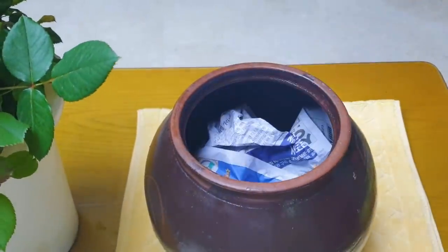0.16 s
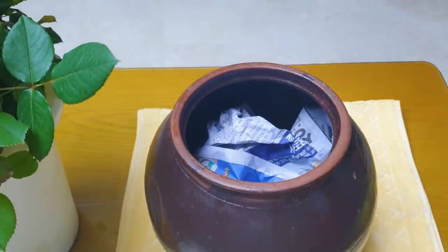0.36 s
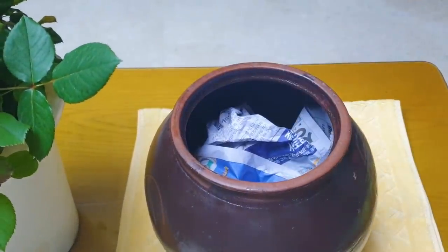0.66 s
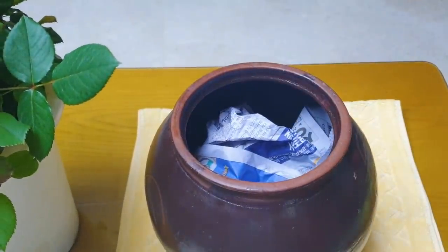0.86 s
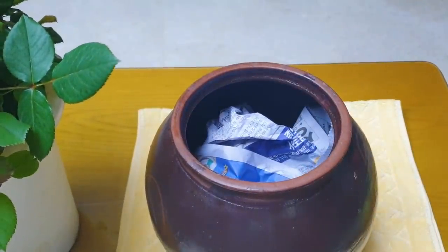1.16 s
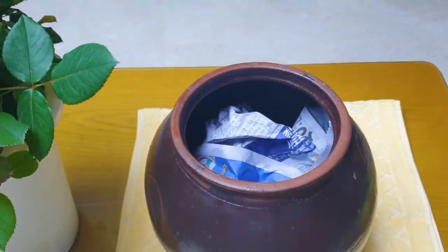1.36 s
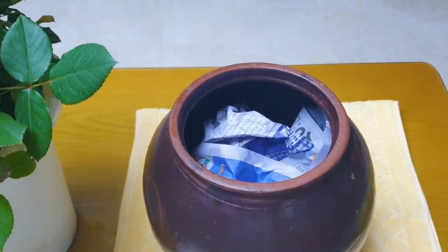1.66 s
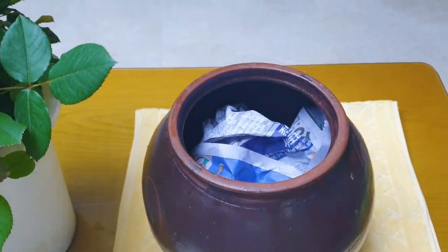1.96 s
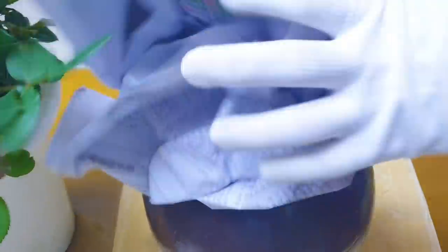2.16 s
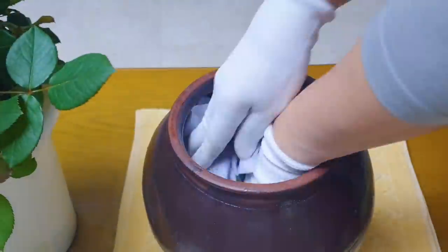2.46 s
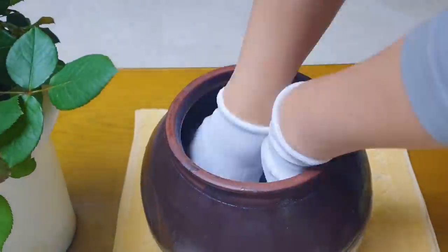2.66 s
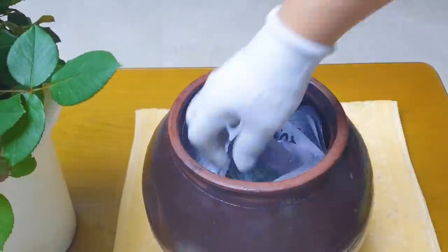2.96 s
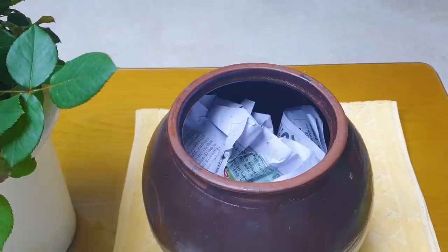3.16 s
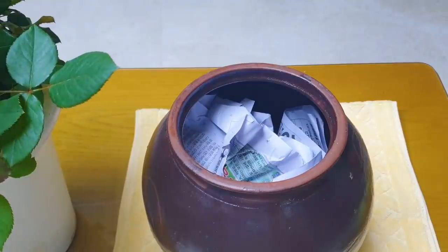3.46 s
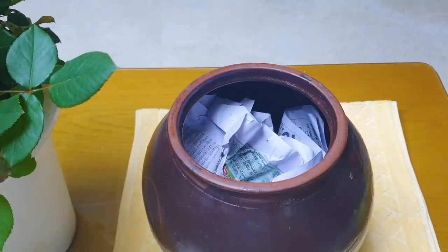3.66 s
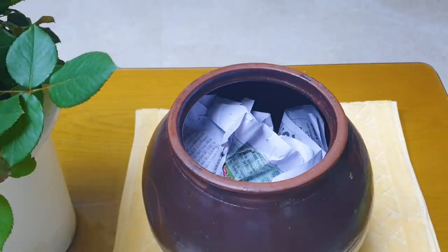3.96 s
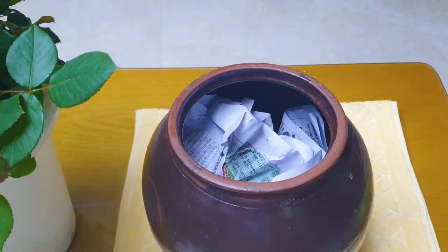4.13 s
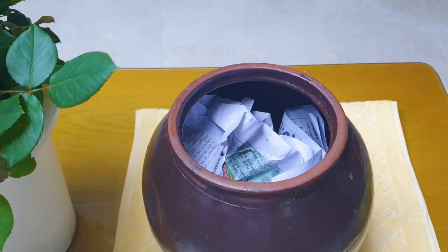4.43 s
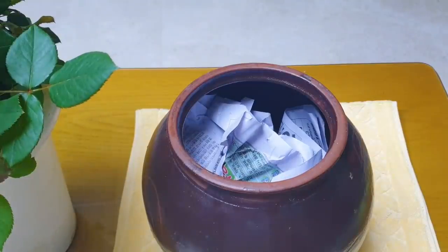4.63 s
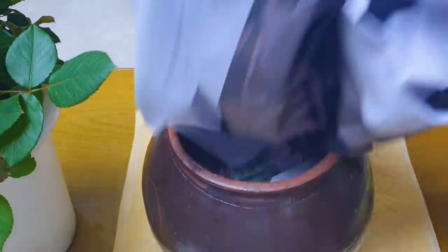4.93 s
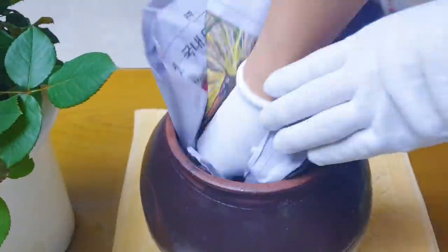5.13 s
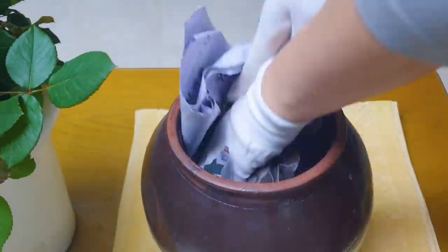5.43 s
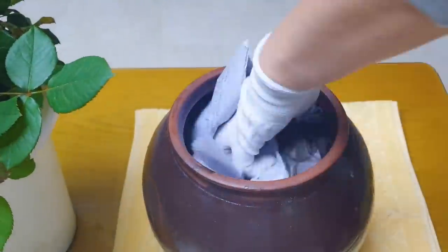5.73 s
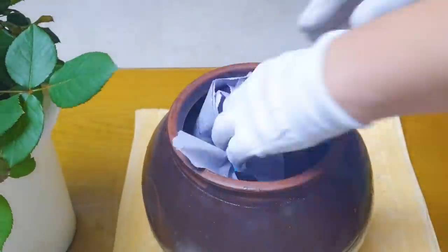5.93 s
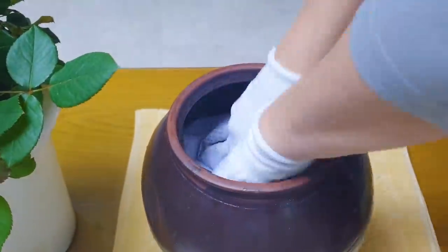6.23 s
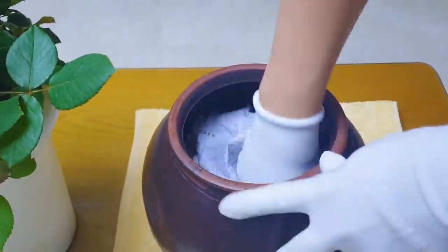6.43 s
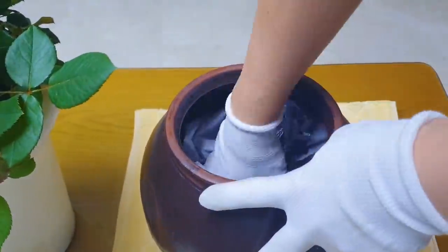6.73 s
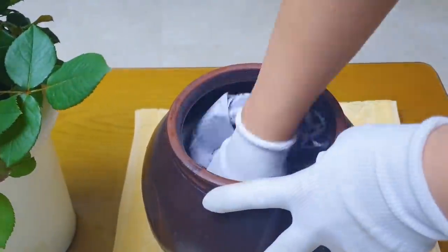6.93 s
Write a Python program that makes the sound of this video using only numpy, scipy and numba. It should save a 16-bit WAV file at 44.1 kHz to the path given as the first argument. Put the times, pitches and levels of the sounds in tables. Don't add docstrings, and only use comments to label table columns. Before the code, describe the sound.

Very close stereo pickup in a small, fairly dry room. A dull press of paper inside a jar fades to tiny ticks over faint rumble. The rumble stops, quiet crumpling follows, then a loud push into the hollow jar. After another lull, a sheet is crumpled with growing force and shoved in hard, followed by smaller crackling pushes and soft knocks.

```python
import sys
import numpy as np
from scipy import signal
from scipy.fft import rfft, irfft
from scipy.io import wavfile
from scipy.ndimage import uniform_filter1d, map_coordinates
from numba import njit

SR = 44100
rng = np.random.default_rng(int(sys.argv[2]) if len(sys.argv) > 2 else 0)


def transcribe(u):
    v = np.clip(np.atleast_2d(u).T, -1, 1)
    q = np.round(v * 32767).astype(np.int16)
    wavfile.write(sys.argv[1], SR, q)


def gain_from_decibels(decibels):
    exponent = np.asarray(decibels, float) / 20
    return 10 ** exponent


N = 312880
T = np.arange(N) / SR
CUT_S = 1.24

# start in seconds, hold in seconds, crackle level in dB,
# swell or sag over the hold in dB, level of the jar's air relative to the crackle in dB.
CRUMPLES = [(1.115, 0.13, -35.5, -2, -15), (1.278, 0.24, -38.5, 6.5, -22),
            (1.568, 0.156, -28.5, -5.5, -16.5), (1.771, 0.11, -42, 11.5, -20), (1.878, 0.23, -24.5, 3, -19),
            (2.124, 0.03, -26.5, -0.5, -14.5), (3.617, 0.084, -40, 7, -23),
            (3.742, 0.093, -37.5, -11.5, -27), (3.892, 0.1, -36, -17.5, -22), (4.031, 0.033, -45, -14, -26),
            (4.08, 0.05, -34.5, -8, -17), (4.177, 0.093, -35, 8.5, -18.5), (4.252, 0.13, -26, -6, -16.5),
            (4.415, 0.024, -35.5, 5, -20), (4.473, 0.1, -27, -1.5, -17), (4.573, 0.11, -21, -7, -18),
            (4.694, 0.063, -32.5, 10.5, -15), (4.764, 0.14, -23.5, -2.5, -14.5),
            (4.946, 0.024, -31, 1, -12)]
LAST_PUSHES = [(5.044, 0.14, -16.5, -13, -9.5), (5.173, 0.067, -19.5, -2.5, -5.5),
               (5.309, 0.09, -21.5, -7.5, -13), (5.421, 0.111, -27, 2, -13.5), (5.58, 0.042, -35.5, 2, -6),
               (5.665, 0.11, -33, 1, -9), (5.809, 0.091, -28, -3, -9.5), (5.936, 0.035, -48.5, 6, -8),
               (5.987, 0.008, -30.5, 3, -8.5), (6.091, 0.1, -30.5, -13, -9),
               (6.179, 0.076, -34.5, -1.5, -8), (6.336, 0.043, -39, -1.5, -5), (6.419, 0.074, -37, 2.5, -7),
               (6.521, 0.036, -33.5, -2.5, -6.5), (6.615, 0.051, -40, 6, -3),
               (6.718, 0.093, -33.5, -1.5, -4.5), (6.882, 0.032, -40, 4, -4.5),
               (6.966, 0.016, -35, 4.5, -3), (7.045, 0.045, -38.5, 2.5, -4.5)]


def level(x, db):
    return x * gain_from_decibels(db) / np.sqrt(np.mean(x ** 2))


def colour(table, hz):
    f, db = np.transpose(table)
    return np.interp(np.log(hz), np.log(f), db)


def curve(table, **ends):
    return np.interp(T, *np.transpose(table), **ends)


def walk(rate):
    hold = int(SR / rate)
    steps = np.repeat(rng.standard_normal(N // hold + 1), hold)
    return 1.215 * uniform_filter1d(steps, hold)[:N]


@njit
def svf(x, hz, width):
    y, band, low = np.empty(len(x)), 0., 0.
    for i in range(len(x)):
        g, k = np.tan(np.pi * hz[i] / SR), width / hz[i]
        v = (band + g * (x[i] - low)) / (1 + g * (g + k))
        band, low, y[i] = 2 * v - band, low + 2 * g * v, k * v
    return y


@njit
def add(out, start, turn, fade, left, right):
    for k in range(len(start)):
        p, z = np.exp(1j * turn[k] - fade[k]), 1. + 0j
        for n in range(min(int(9 / fade[k]), out.shape[1] - start[k])):
            out[0, start[k] + n] += n * (z * left[k]).imag
            out[1, start[k] + n] += n * (z * right[k]).imag
            z *= p


def grains(s, hz, cycles, peak, pan_db, spread=0.96):
    lag_s, lag_spread_s = 2.2e-5, 2.6e-5
    twist_rad, twist_hz = 0.44, 2010
    hz = np.clip(hz, 40., .45 * SR)
    fade = np.clip(hz / SR / cycles, 1e-4, 2.)
    chance = rng.standard_normal((len(s), 3)).T
    lag = lag_s + lag_spread_s * chance[0]
    phase = 2 * np.pi * (lag_s / lag_spread_s + chance[1])
    size = peak * np.e * fade * np.exp(1j * phase)
    twist = twist_rad * np.clip(hz / twist_hz, 0, 1) ** 2 * chance[2]
    half = np.exp(1j * spread * (np.pi * hz * lag + twist)) * gain_from_decibels(pan_db / 2)
    start = np.clip(s * SR - .5 / fade, 0, N - 1).astype(np.int64)
    out = np.zeros((2, N))
    add(out, start, 2 * np.pi * hz / SR, fade, size * half, size / half)
    return out


def steady_noise(table, db, same_hz=490.0):
    hz = np.arange(1, N // 2 + 2) * SR / N
    mid, side = rfft(rng.standard_normal((2, N)))
    side = side * np.clip(hz / same_hz, .45, 1)
    return level(irfft(np.array([mid + side, mid - side]) * gain_from_decibels(colour(table, hz)), N), db)


def hum():
    # pitch in Hz, level in dB rms.
    tones = [(166.9, -74.5), (247.6, -74.5), (511.4, -77.5)]
    drift_hz = 2 * walk(12.0)
    out = np.zeros(N)
    for hz, db in tones:
        phase = 2 * np.pi * np.cumsum(hz + drift_hz) / SR
        out += 2 ** .5 * gain_from_decibels(db + 2 * walk(12)) * np.sin(phase)
    return out


def background():
    # Hz, dB per Hz.
    hiss = [(18, -58.5), (30, -20), (103, -13), (252, -8), (303, -12.5), (512, -18.5), (937, -28.5),
            (10200, -28), (14800, -18), (16000, -21)]
    rumble = [(18, -36), (30, -3), (70, 5), (210, -14), (273, -10), (649, -8), (1130, -9.5), (5310, -3.5),
              (11400, -10), (16000, -27)]
    before = np.clip((CUT_S - T) * 50, 0, 1)
    return steady_noise(hiss, -61) + hum() + before * gain_from_decibels(2 * walk(6.48)) * steady_noise(rumble, -53.5)


def grips(rows):
    grip_db_per_s, release_db_per_s = 592.5, 394
    linger = 0.25
    dip_s, dip_half_s, dip_db = 5.006, 0.015, -20
    paper, body = np.full((2, N), gain_from_decibels(-240.))
    for s, hold, db, sag_db, air_db in rows:
        u = T - s
        now_db = db + sag_db * np.clip(u / hold, 0, 1) + grip_db_per_s * np.minimum(u, 0)
        release_db = release_db_per_s * np.maximum(u - hold, 0)
        power = gain_from_decibels(2 * (now_db - release_db))
        paper = paper + power
        body = body + power * gain_from_decibels(2 * (air_db + linger * release_db))
    dip = gain_from_decibels(2 * dip_db * np.clip(1 - abs(T - dip_s) / dip_half_s, 0, 1))
    return np.array([paper, body]) * dip


def inside_grips():
    first_pushes = [(0.0, 0.12, -30.5, -6, -7.5), (0.173, 0.378, -49, -3, -3.5),
                    (2.171, 0.2, -17, -3.5, -7.5), (2.389, 0.1, -23.5, -3.5, -8.5),
                    (2.53, 0.08, -22.5, -10, -8.5), (2.656, 0.051, -33, 0.5, -6),
                    (2.783, 0.079, -39, -5, -9.5), (2.854, 0.067, -36.5, 5.5, -8.5),
                    (2.999, 0.083, -41, -5, -5.5), (3.114, 0.089, -52.5, -6.5, -16),
                    (3.261, 0.08, -60.5, -4.5, -14), (3.382, 0.012, -55.5, 2.5, -16)]
    shove = [
        (5.028, 0.017, -26.5, 3.4, -1),
    ]
    settling = [
        (0.6, 0.099, -56, -2, -4),
        (0.84, 0.2, -55, -5, -12),
        (1.097, .012, -49.5, 4, -6),
    ]
    return grips(first_pushes + shove + LAST_PUSHES + settling)


def crackle(effort_db, crisp_db, folds_db, count=140000):
    # Hz, dB per Hz.
    spectrum = [(59, -50), (100, -14.5), (1580, -5), (2860, -6.5), (5770, -4.5), (9410, 1), (11900, 1),
                (16000, -0.5)]
    scatter_db, burst_db, patchy_db = 3.0, 0.9, 3.5
    when, pitch, size, side = rng.random((count, 4)).T
    hz = 800 * 20 ** np.sqrt(pitch)
    i = (when * (N - 1)).astype(int)
    fine = np.clip(np.log(hz / 7000) / 0.19, 0, 1)
    broad = np.clip(np.log(2800 / hz) / 0.22, 0, 1)
    crowd_db = 10 * np.log10(hz * hz / np.sqrt(pitch + .01))
    unit = level(gain_from_decibels(colour(spectrum, hz) + crowd_db - scatter_db * np.log(1.004 - size)), 0)
    tilt_db = fine * (crisp_db[i] - 1.5) + broad * (folds_db[i] + 7.0)
    facets = np.array([walk(22) for _ in range(11)])
    patch_db = patchy_db * map_coordinates(facets, [10 * np.sqrt(pitch), i], order=1)
    burst = burst_db * walk(60) + 1.54 * walk(300)
    peak = unit * gain_from_decibels(effort_db[i] + tilt_db + patch_db + burst[i] + 4.0)
    sheet = grains(when * N / SR, hz, 0.71, peak, 2.8 * (side - .5))
    return signal.sosfilt(signal.butter(3, 750., "high", fs=SR, output="sos"), sheet)


def paper_sheet(effort_db, depth_db):
    first_shot = T < CUT_S
    picked_up = first_shot * (T > 1.08)
    crisp_db = -5 - 0.1035 * depth_db - 10.5 * first_shot
    folds_db = -8 - 0.06 * depth_db + 3.5 * picked_up
    return crackle(effort_db, crisp_db, folds_db)


def jar(air_db, hz, width_hz, over_db=-99.):
    jolts_per_s, scatter_db = 2200., 2.5
    hit, size = rng.random((2, N))
    sign = np.sign(hit * SR / jolts_per_s - .5)
    jolts = (hit < jolts_per_s / SR) * gain_from_decibels(-scatter_db * np.log(1.01 - size)) * sign
    hz = hz * (1 + 0.051 * walk(40))
    ring = svf(svf(jolts, hz, width_hz), hz, width_hz)
    ring = svf(ring, 0.91 * hz, 2.6 * width_hz)
    over = svf(svf(jolts, 3.14 * hz, 700.), 3.87 * hz, 700.)
    return (level(ring, -0.26) + level(over, over_db)) * gain_from_decibels(air_db + 2.0 * walk(45))


def hollow_jar():
    # seconds, level in dB.
    swell = [
        (0.0, -42.5),
        (0.074, -42),
        (0.186, -57.5),
        (0.378, -52),
        (0.47, -72),
        (0.674, -60),
        (0.8, -93),
    ]
    return jar(curve(swell, right=-120), 254 + 0 * T, 120.0)


def jar_ring(inside_db):
    # seconds, pitch in Hz.
    pitch = [(0.0, 634), (2.15, 697), (2.34, 615), (2.5, 690), (2.95, 740), (5.05, 693), (5.2, 500),
             (5.4, 617), (7.09, 677)]
    return jar(inside_db, curve(pitch), 283, over_db=-7.0)


def shifting_pile(effort_db):
    # seconds, change in dB.
    packed = [(0.0, -2), (1.24, -4), (1.3, 2.5), (2.36, -2), (2.46, -10), (3.05, -2), (5.5, -1.5),
              (6.0, -2)]
    pile_db = -42.5 + 1.55 * (effort_db + 21) + curve(packed)
    sway = jar(pile_db - 10, 255.0 + 0 * T, 400.0) * np.array([[1], [-1]])
    return jar(pile_db, 310.0 + 0 * T, 580.0) + sway


def snaps(rows, count=6, spread_s=0.0025, fall_db=22.0):
    s, db, hz = np.transpose(rows)
    later, pitch, side = rng.random((len(s), 3, count)).transpose(1, 2, 0)
    pan_db = 3.0 * (side - .5)
    first = grains(s, hz, .62, gain_from_decibels(db - 2), pan_db[0], spread=.4)
    near_s = s + spread_s * later
    near_hz = hz * np.exp(1.5 * (pitch - .5))
    size = gain_from_decibels(db - 8 - fall_db * later)
    return first + grains(near_s.ravel(), near_hz.ravel(), 0.5, size.ravel(), pan_db.ravel())


def resting_ticks():
    # seconds, peak in dB, ring in Hz.
    ticks = [(0.0787, -14, 4500), (0.126, -37, 6350), (0.183, -29, 5570), (0.1928, -26, 5000),
             (0.243, -22, 4640), (0.2969, -21, 6400), (0.3586, -31, 5570), (0.439, -25, 6100),
             (0.4752, -29, 7200), (0.4938, -21, 6700), (0.5437, -28.5, 6490), (0.643, -31, 6130),
             (0.6532, -28, 6000), (0.835, -22.5, 5300), (0.9492, -28.5, 5610), (1.1004, -29, 7310),
             (1.106, -28, 6220), (1.1204, -27, 6240), (3.1777, -43, 9990), (3.268, -29.5, 8670),
             (3.334, -25.5, 11800), (3.5808, -30.5, 7350), (3.6157, -26, 5700), (4.0267, -36, 7610),
             (4.064, -20, 7650), (6.489, -19, 4400), (6.8777, -25, 9790)]
    return snaps(ticks, count=8, spread_s=.005, fall_db=6.5)


def strays(effort_db, count=140):
    when, size, pitch = rng.random((count, 3)).T
    db = effort_db[(when * (N - 1)).astype(int)] + 15 - 14 * np.sqrt(size)
    return np.transpose([when * N / SR, db, 5530 * np.exp(pitch - .5)])


def lone_snaps(effort_db):
    # seconds, peak in dB, ring in Hz.
    creases = [(1.1367, -26, 1800), (1.4748, -21, 1560), (1.7133, -24, 4750), (1.7858, -22, 4840),
               (2.1495, -3.5, 3740), (2.3598, -4, 6100), (2.449, -5, 6620), (2.4704, -8, 6716),
               (2.5452, -10, 2240), (2.9172, -14.5, 6300), (3.7668, -19, 12800), (3.9034, -26, 7790),
               (4.1754, -14.5, 5660), (4.4744, -7, 5130), (4.7744, -6, 8200), (4.9114, -24, 4800),
               (4.9263, -8, 8500), (4.9924, -16.5, 2350), (5.2374, -16, 7300), (5.2992, -6, 9360),
               (5.3543, -4.5, 5100), (5.3972, -6.5, 5010), (5.4732, -10.5, 3600), (5.7009, -18.5, 2110),
               (5.94, -9.5, 9960), (6.0791, -22.5, 2100), (6.4171, -16.5, 3350), (6.5415, -12.5, 10400),
               (6.6186, -26, 1560), (6.9544, -16, 12200)]
    rim_taps = [
        (3.0647, -23, 1630),
        (3.071, -22.5, 2170),
        (3.0884, -25, 3300),
    ]
    catches = [(s, db + 9, 4500) for s, _, db, *_ in CRUMPLES + LAST_PUSHES]
    return snaps(np.vstack([catches, rim_taps, creases, strays(effort_db)]))


def thumps():
    # seconds, peak in dB, ring in Hz.
    knocks = [(0.438, -33, 664.6), (2.164, -14, 729), (2.536, -15.5, 750), (3.061, -31, 704),
              (3.07, -26, 1060), (3.072, -39, 330), (3.275, -53, 436), (3.378, -54, 330), (3.695, -41, 320),
              (4.925, -17, 926), (5.034, -8.5, 690), (5.177, -12.5, 585), (5.351, -20.5, 604),
              (5.473, -20.5, 730), (5.673, -25.5, 616), (5.813, -23, 570), (6.083, -25, 656),
              (6.524, -25, 680), (6.616, -35, 659), (6.717, -24, 614), (6.755, -26.5, 624),
              (6.924, -27, 664), (6.969, -25, 670), (7.014, -29, 725)]
    s, db, hz = np.transpose(knocks)
    return grains(s + 0.0013, hz, 1.24, gain_from_decibels(db - 3.5), 0 * s)


def loose_ball(outside_db):
    return jar(outside_db, 500. + 0 * T, 680)


def room(x, t60=0.045, wet_db=-7.5, same_hz=750.):
    n = np.arange(int(.3 * SR))
    decay = np.exp(-np.log(1000) * n / (t60 * SR)) * (n > .002 * SR)
    mid, side = rng.standard_normal((2, len(n))) * decay
    side = 0.51 * signal.lfilter(*signal.butter(2, same_hz, "high", fs=SR), side)
    tail = np.array([mid + side, mid - side]) / np.sqrt(2 * np.sum(mid ** 2))
    return x + gain_from_decibels(wet_db) * signal.fftconvolve(x, tail, axes=1)[:, :N]


def scene():
    outside, inside = grips(CRUMPLES), inside_grips()
    effort_db, body_db = 10 * np.log10(outside + inside)
    paper = paper_sheet(effort_db, body_db - effort_db) + resting_ticks() + lone_snaps(effort_db)
    hollows = hollow_jar() + jar_ring(10 * np.log10(inside[1])) + loose_ball(10 * np.log10(outside[1]))
    near = paper + hollows + shifting_pile(effort_db) + thumps()
    near = signal.sosfilt(signal.butter(2, 110., "high", fs=SR, output="sos"), near)
    return room(near) + background()


def low_pass(x):
    return signal.sosfilt(signal.butter(12, 16970, fs=SR, output="sos"), x)


def record(dry):
    x = np.tanh(dry * gain_from_decibels(np.array([[-.45], [.45]])))
    x = signal.sosfilt(signal.ellip(8, .2, 70, 15800, fs=SR, output="sos"), x)
    return low_pass(x)


dry = scene()
out = record(dry)
transcribe(out)
```